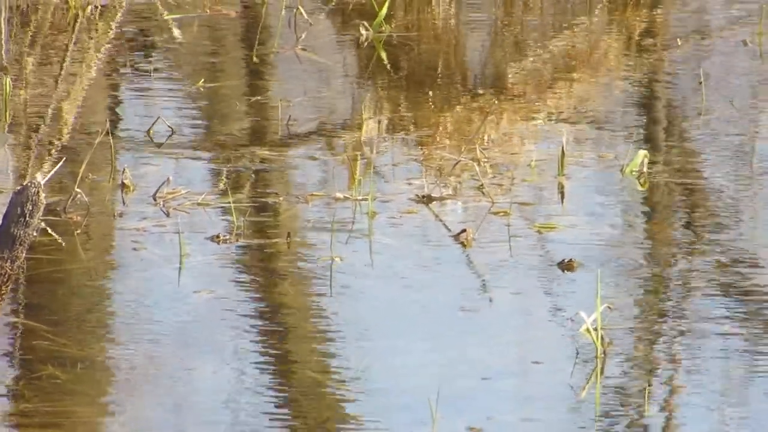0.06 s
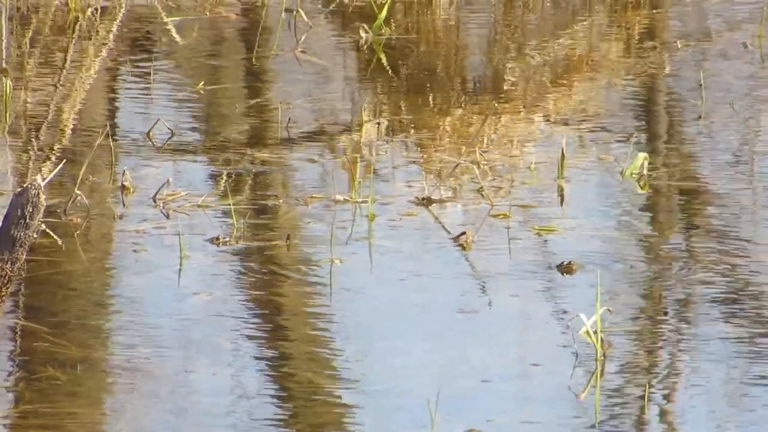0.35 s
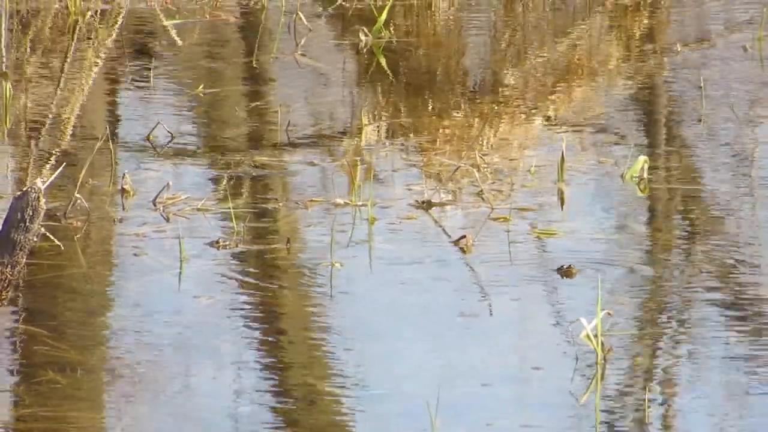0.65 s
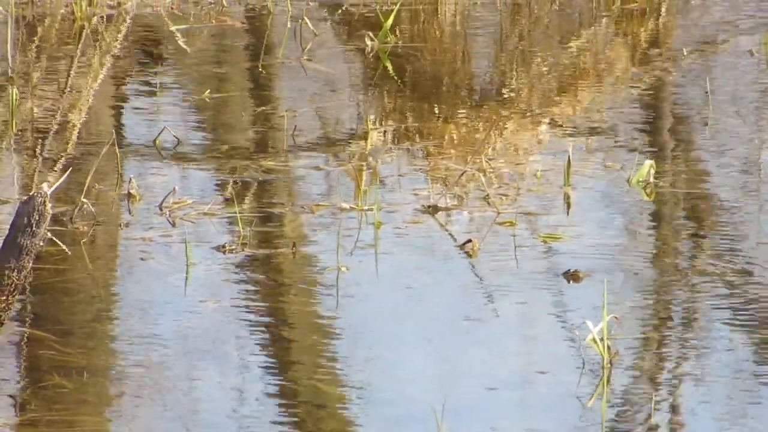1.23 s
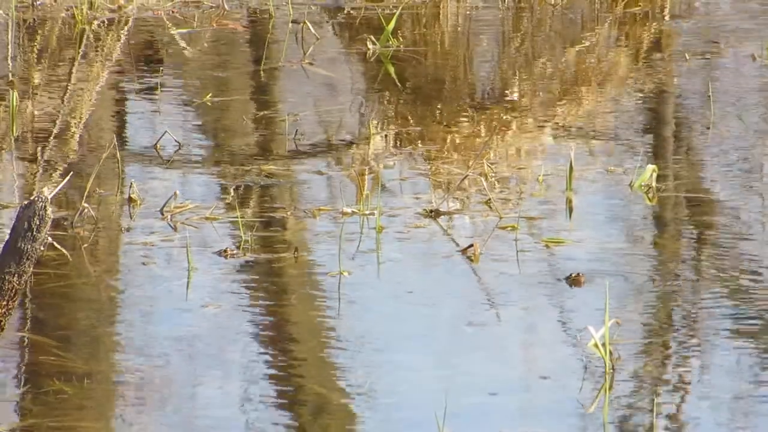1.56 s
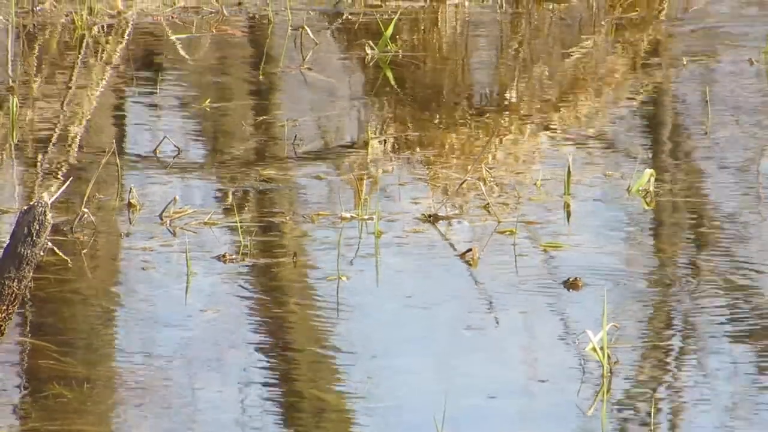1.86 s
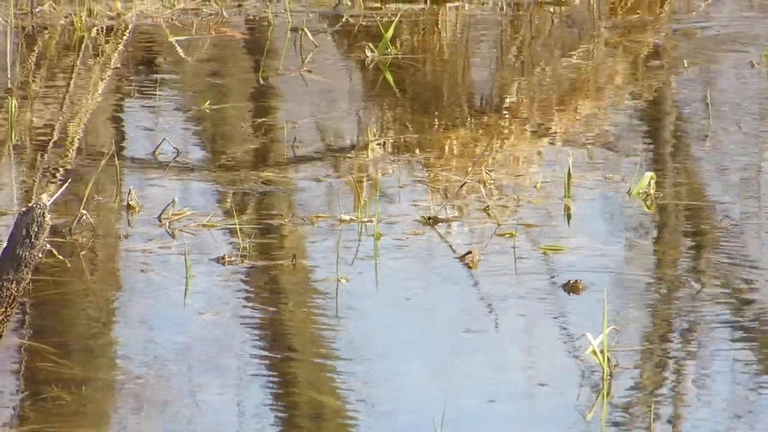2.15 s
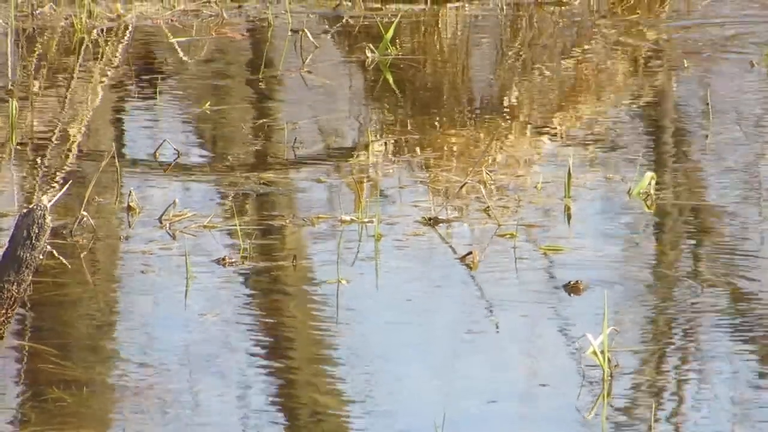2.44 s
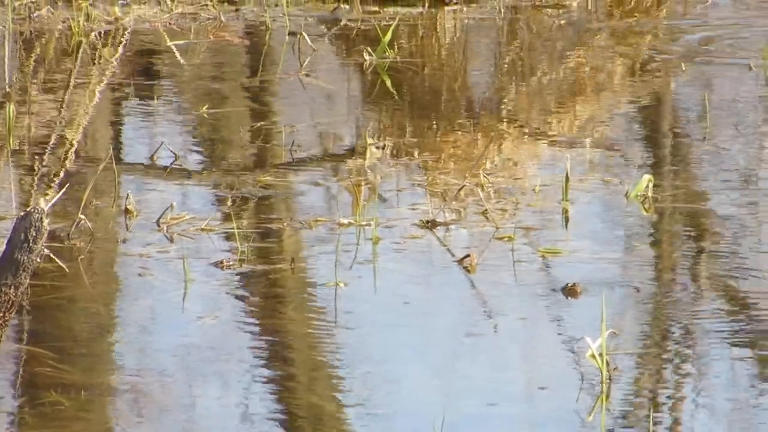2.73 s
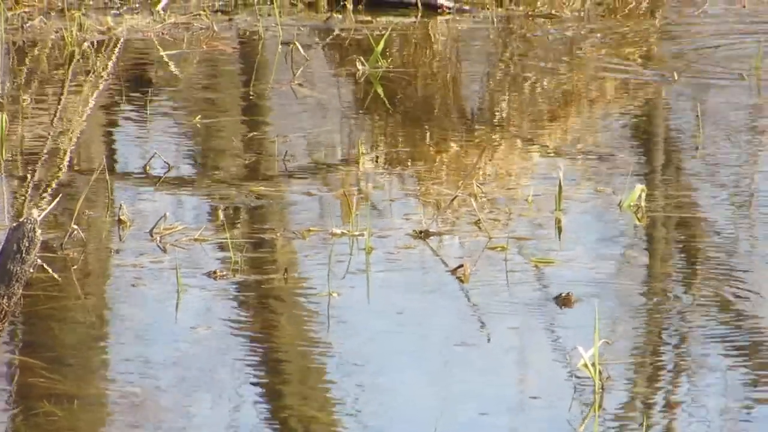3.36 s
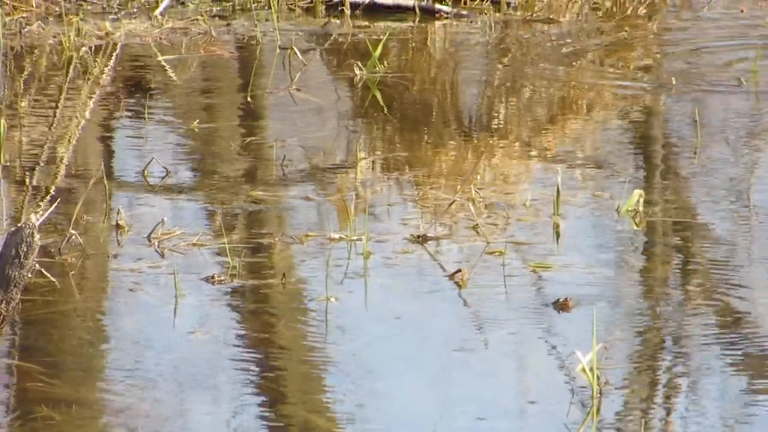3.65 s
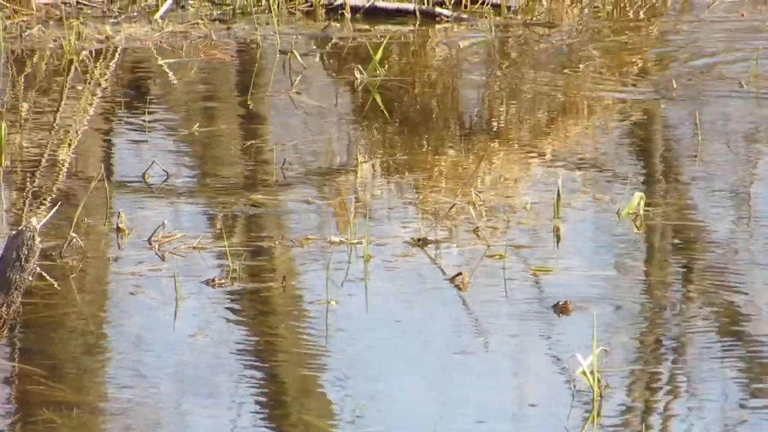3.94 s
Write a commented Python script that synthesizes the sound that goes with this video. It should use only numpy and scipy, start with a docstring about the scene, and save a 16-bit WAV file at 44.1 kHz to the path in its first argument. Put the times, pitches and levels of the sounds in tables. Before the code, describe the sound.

Frogs call on a pond, opening with bright clicks and a dry, knocking croak until 0.8 seconds. Rising, clicking trills overlap, loudest from about 1.5 to 2.2 seconds, then return from 2.7 to the end. Short low chuckles start near 0.8 seconds, and a second knocking croak runs from 2.4. Distant frogs and a faint hush continue throughout, with a light gust on the microphone around 1.6 seconds.

```python
"""Bright clicks and a dry, knocking snore open the scene: frogs on a woodland pond. Small frogs take
turns with rising trills over a distant chorus, each click a snap of the larynx ringing the vocal sac.
Larger frogs snore in throaty knocks and chuckle in short low bursts. The trees return a soft tail,
and light gusts rumble on the microphone over a steady hush."""
import sys
import numpy as np
from scipy import signal
from scipy.fft import rfft, irfft
from scipy.io import wavfile
from scipy.ndimage import uniform_filter1d

SR = 44100
rng = np.random.default_rng(int(sys.argv[2]) if len(sys.argv) > 2 else 0)


def store_pcm(level_fs):
    """Save levels as 16-bit WAV."""
    pcm = np.round(np.clip(level_fs, -1, 1) * 32767).astype(np.int16)
    wavfile.write(sys.argv[1], SR, np.atleast_2d(pcm).T)


N = 176400
PULSE_T = np.arange(1100) / SR  # time axis of one click or knock, s


def amp(db):
    """Decibels to gain."""
    return 10 ** (np.asarray(db) / 20)


def unit(x):
    """Scales to rms 1."""
    return x / np.sqrt(np.mean(x ** 2) + 1e-20)


def add(mix, start_s, sound):
    """Mixes a sound in, trimming any overhang."""
    at = round(start_s * SR)
    sound = sound[max(-at, 0):]
    part = mix[max(at, 0):][:len(sound)]
    part += sound[:len(part)]


def noise(eq_curve):
    """Noise of rms 1, coloured by an EQ curve."""
    hz, db = np.transpose(eq_curve)
    shape_db = np.interp(np.log(np.fft.rfftfreq(N, 1 / SR) + 1), np.log(hz), db)
    return unit(irfft(rfft(rng.standard_normal(N)) * amp(shape_db), N))


# Colour of the air bed, mid and side: f/Hz, relative level/dB
AIR_MID_EQ = [(30, -3), (120, -10.5), (300, -5.5), (600, -5.5), (1200, -5.5), (2300, -11.5), (5000, -19.5),
              (8000, -25.5), (15000, -34.5)]
AIR_SIDE_EQ = [(30, -1.5), (120, -10), (300, -4.5), (800, -3), (2300, -8), (5000, -16), (8000, -21),
               (15000, -31.5)]

def air():
    """A steady, wide bed of outdoor hush."""
    return amp(-50) * noise(AIR_MID_EQ) + amp(-47) * noise(AIR_SIDE_EQ) * np.array([[1], [-1]])


# Gust swells: peak t/s, half length/s, relative level/dB
GUSTS = [(0.134, 0.069, -46), (0.566, 0.031, -48), (0.933, 0.015, -46.5), (1.27, 0.052, -44.5),
         (1.506, 0.027, -40), (1.6, 0.028, -33.5), (1.71, 0.032, -35), (1.799, 0.03, -45.5),
         (2.49, 0.26, -53.5)]
# Colour of the wind rumble: f/Hz, relative level/dB
WIND_EQ = [(15, -5.5), (30, 4.5), (70, -1.5), (150, -10.5), (300, -26), (700, -41.5), (3000, -77)]

def wind(lump_samples=1500, lump_db=5.5, fade_db_per_s=2):
    """Lumpy gusts over a fading breeze push the two microphone channels in opposite directions."""
    t = np.arange(N) / SR
    lumps = uniform_filter1d(rng.standard_normal(N), lump_samples)
    lumps = unit(uniform_filter1d(lumps, lump_samples))
    breeze = amp(-57.5 - fade_db_per_s * t)
    gusts = sum(amp(db) * np.exp(-((t - peak) / half) ** 2) for peak, half, db in GUSTS)
    rumble = (breeze + gusts) * amp(15 + lump_db * lumps) * noise(WIND_EQ)
    return rumble * np.array([[0.69], [-1]])


def bank_echoes(pulse, echo_db=-16.5):
    """A pulse with three early reflections off banks and reeds."""
    out = pulse.copy()
    for delay_s in rng.uniform(0.003, 0.012, 3):
        add(out, delay_s, amp(echo_db) * pulse)
    return out


def woods(dry, wet_db, t60_s=0.47, width=0.27):
    """Adds the stereo reverb tail that the trees scatter back."""
    t = np.arange(SR) / SR
    taps = rng.standard_normal((2, SR)) * (rng.random((2, SR)) < 0.05)  # sparse reflections
    taps = taps * np.exp(-np.log(1000) * t / t60_s) * (t > 0.003)
    taps /= np.linalg.norm(taps[0])
    mid, side = signal.fftconvolve(dry[None], taps, axes=1)[:, :N] * amp(wet_db)
    return np.array([dry + mid + width * side, dry + mid - width * side])


# Faint side resonances that colour a click: f/Hz, relative level/dB
CLICK_MODES = [(1720, -22.5), (4450, -37), (4750, -31.5), (5080, -35.5), (6800, -56.5)]

def click(hz, rise_ms, sag_hz=79, detune=0.033):
    """A snap of the larynx sets a small frog's vocal sac ringing on one slightly sagging note."""
    t = PULSE_T
    age = t * 1000 / rise_ms  # 1 at the envelope's peak
    envelope = (age * np.exp(1 - age)) ** 3.24
    phase = 2 * np.pi * np.cumsum(hz + sag_hz * np.tanh(1 - age)) / SR
    note = envelope * np.sin(phase)
    octave = amp(-38.5) * envelope ** 2 * np.sin(2 * phase)
    sides = sum(amp(db) * np.sin(2 * np.pi * f * (1 + detune * rng.standard_normal()) * t)
                for f, db in CLICK_MODES)
    rasp_band = signal.butter(2, (1970, 5000), "bandpass", fs=SR)
    rasp = signal.lfilter(*rasp_band, rng.standard_normal(len(t))) * np.exp(-t / 0.009)
    snap = (sides + amp(-23) * rasp) * np.interp(0.96 * t, t, envelope)  # slightly slower envelope
    return bank_echoes(note + octave + snap)


# Distant trill cues: start t/s, length/s, relative level/dB, first f/Hz, last f/Hz
FAR_TRILLS = [(-.06, 0.18, -27.5, 3910, 3140), (0.152, 0.38, -33, 2970, 3230),
              (0.399, 0.51, -29, 3074, 3420), (1.002, 0.86, -28.5, 2900, 2975),
              (1.302, 0.7, -29.5, 3130, 3490), (1.952, 0.36, -26, 3530, 3570),
              (2.197, 0.461, -34, 3203, 3480), (2.949, 0.46, -25.5, 3306, 3635),
              (3.397, 1, -32.5, 2777, 3300)]

def far_trills(clicks_per_s=42, rise_ms=2.07, scatter_hz=45.6):
    """The distant chorus: overlapping runs of clicks that fade in and out, blurred by the trees."""
    out = np.zeros(N)
    for start, length, db, first_hz, last_hz in FAR_TRILLS:
        for k, (late, detune) in enumerate(rng.uniform(-1, 1, (40, 2))):
            progress = (k + 0.5 + 0.3 * late) / clicks_per_s / length
            if 0 < progress < 1:
                gain = amp(db) * np.sin(np.pi * progress) ** 0.45
                hz = first_hz + (last_hz - first_hz) * progress + scatter_hz * detune
                add(out, start + progress * length, gain * click(hz, rise_ms))
    return woods(out, wet_db=-0.5)


def knock(modes, hz):
    """One pulse from a large frog's throat: resonances that swell and die within a few cycles."""
    t = PULSE_T
    ring = sum(amp(db) * (t / rise * np.exp(1 - t / rise)) ** 3 * np.sin(2 * np.pi * ratio * hz * t)
               for ratio, db, rise in modes)
    return bank_echoes(ring)


# Throat ring of stray knocks and chuckles: ratio to pitch, relative level/dB, attack/s
GRUNT_MODES = [(1, -1.5, .0017), (2, -22, 0.0026)]

def stray_knocks(count=600, knocks_per_s=110, centre_hz=900):
    """A soft patter of random knocks from farther frogs all over the pond."""
    out = np.zeros(N)
    times = np.cumsum(rng.exponential(1 / knocks_per_s, count))
    for at, (accent, detune) in zip(times, rng.standard_normal((count, 2))):
        add(out, at, amp(-36 + 2.5 * accent) * knock(GRUNT_MODES, centre_hz * np.exp(0.28 * detune)))
    return out


# Chuckle cues: start t/s, length/s, relative level/dB
CHUCKLES = [(0.813, 0.043, -31.5), (0.908, 0.053, -31), (1.007, 0.042, -31.5), (1.11, 0.057, -28),
            (1.209, 0.066, -27), (1.312, 0.082, -28.5), (1.423, 0.027, -29), (1.467, 0.082, -31),
            (1.619, 0.056, -32.5), (1.905, 0.065, -30), (2.006, 0.077, -26.5), (2.111, 0.082, -27.5),
            (2.215, 0.096, -29), (2.32, 0.054, -31), (2.45, 0.044, -32.5), (2.56, 0.083, -30.5),
            (2.674, 0.13, -31.5), (2.847, 0.056, -31), (3.229, 0.039, -31), (3.324, 0.069, -27.5),
            (3.434, 0.094, -31), (3.708, 0.072, -30.5), (3.812, 0.073, -32)]
# Opening pitch of the grunts, in two sinking series: t/s, f/Hz
CHUCKLE_PITCH = [(1.15, 920), (1.62, 800), (1.9, 1116), (2.25, 859)]

def chuckles(knocks_per_s=95, fall_per_knock=0.031):
    """Short grunts of rapid, uneven knocks, each grunt dropping in pitch."""
    out = np.zeros(N)
    for start, length, db in CHUCKLES:
        first_hz = np.interp(start, *np.transpose(CHUCKLE_PITCH))
        for k, (late, accent, detune) in enumerate(rng.standard_normal((16, 3))):
            hz = first_hz * (1 - fall_per_knock * k + 0.01 * detune)
            gate = np.clip(length * knocks_per_s - k, 0, 1)
            at = start + (k + 0.062 * late) / knocks_per_s
            add(out, at, gate * amp(db + 0.17 * accent) * knock(GRUNT_MODES, hz))
    return amp(1.5) * out


def swell(progress, first_db, knee_db, knee_at, last_db):
    """A call's gain: two ramps in relative level that meet at the fraction knee_at of the call."""
    return amp(np.interp(progress, [0, knee_at, 1], [first_db, knee_db, last_db]))


# Snore cues: swell (first level/dB, knee level/dB, knee position, last level/dB),
# first f/Hz, last f/Hz, start t/s, end t/s, knock gap/s, growth per gap/s
SNORES = [(-19.5, -18, .5, -19.5, 1170, 1170, .0085, .79, .0466, .0001),
          (-31, -25, .65, -23, 1190, 1040, 2.407, 4.0, .0588, .00057)]
# Throat ring of a snore: ratio to the cue's f, relative level/dB, attack/s
SNORE_MODES = [(0.96, -8.5, 0.0018), (0.58, -19, 0.002)]

def snores(lead_s=0.003342):
    """Long rows of dry knocks that gradually slow down."""
    out, k = np.zeros(N), np.arange(26)
    for *dynamics, first_hz, last_hz, start, end, gap, growth in SNORES:
        times = start + gap * k + growth * k ** 2 / 2
        for at in times[times < end]:
            progress = (at - start) / (end - start)
            hz = first_hz + (last_hz - first_hz) * progress
            add(out, at - lead_s, swell(progress, *dynamics) * knock(SNORE_MODES, hz))
    return amp(6) * out


def large_frogs(band_hz=(490, 2500)):
    """Snores, chuckles and stray knocks in the band the vocal sacs radiate, with a long, wide tail."""
    sac_band = signal.butter(4, band_hz, "bandpass", fs=SR, output="sos")
    calls = signal.sosfilt(sac_band, snores() + chuckles() + stray_knocks())
    return woods(calls, wet_db=-13, t60_s=1, width=0.76)


# Foreground trill cues: swell (first level/dB, knee level/dB, knee position, last level/dB),
# first f/Hz, last f/Hz, first attack/ms, last attack/ms, list of click peaks t/s
NEAR_TRILLS = [ (-14.5, -6, .5, -12.5, 3216, 3156, 2.8, 3.156, [0.028, .043, .092]),
               (-37.5, -20.5, 0.38, -21, 2866, 3200, 3.5, 2.8, [.217, 0.257, 0.303, 0.347, .392, 0.44, .489, 0.54, 0.592, 0.646, 0.704, .762, 0.824, .893, 0.964, 1.039, 1.112]),
               (-24.5, -15.5, 0.4, -14, 3016, 3474, 3.2, 2.3, [0.768, .805, 0.843, 0.877, 0.913, .950, .987, 1.025, 1.063, 1.102, 1.142, 1.182, 1.224, 1.268, 1.313, 1.358, 1.405, 1.452, 1.497, 1.541]),
               (-26.5, -8, 0.69, -7, 2934, 3180, 2.344, 3.1, [1.371, 1.399, 1.432, 1.467, 1.504, 1.547, 1.585, 1.633, 1.684, 1.739, 1.805, 1.872, 1.939, 2.005]),
               (-22.5, -8, 0.798, -15.5, 2820, 3268, 2.7, 2.7, [1.723, 1.751, 1.781, 1.813, 1.845, 1.88, 1.918, 1.959, 2.01, 2.05, 2.102, 2.148, 2.194]),
               (-39.5, -21.5, 0.33, -20, 2870, 3160, 2.8, 3.6, [2.68, 2.722, 2.767, 2.812, 2.86, 2.91, 2.959, 3.015, 3.069, 3.123, 3.181, 3.245, 3.306, 3.377, 3.453, 3.525]),
               (-21, -13, 0.75, -14, 3090, 3467, 2.7, 2.6, [3.28, 3.315, 3.351, 3.385, 3.421, 3.459, 3.496, 3.533, 3.572, 3.613, 3.654, 3.698, 3.743, 3.787, 3.837, 3.886, 3.934, 3.980]),
               (-32.5, -22, 0.91, -21.5, 2880, 3070, 2.92, 1.5, [3.578, 3.617, 3.663, 3.707, 3.755, 3.806, 3.856, 3.912, 3.969]),
               ]

def near_trills(scatter_db=0.66, scatter_hz=24.5):
    """Small frogs up close: runs of bright clicks, most climbing in pitch and strength."""
    out = np.zeros(N)
    for *dynamics, first_hz, last_hz, first_rise, last_rise, peaks in NEAR_TRILLS:
        for peak, progress in zip(peaks, np.linspace(0, 1, len(peaks))):
            rise_ms = first_rise + (last_rise - first_rise) * progress
            gain = swell(progress, *dynamics) * amp(-scatter_db * rng.standard_normal())
            hz = first_hz + (last_hz - first_hz) * progress + scatter_hz * rng.standard_normal()
            add(out, peak - rise_ms / 1000, gain * click(hz, rise_ms))
    return woods(out, wet_db=-12)


def scene():
    """The mix: all frogs panned a touch right, over air and wind."""
    frogs = amp(0.48) * near_trills() + amp(2) * far_trills() + large_frogs()
    return frogs * amp([[-0.4], [0.4]]) + air() + wind()


def record(dry):
    """A steep high cut at 15.9 kHz."""
    high_cut = signal.firwin(511, 15900, window=("kaiser", 9), fs=SR)
    return signal.oaconvolve(dry, high_cut[None], "same")


dry = scene()
out = record(dry)
store_pcm(out)
```